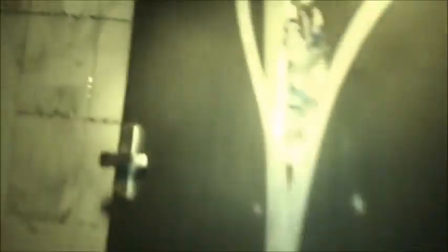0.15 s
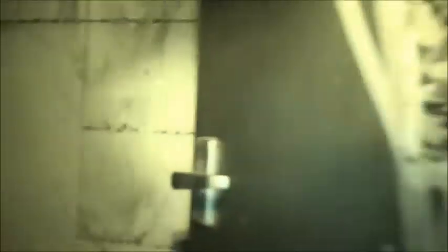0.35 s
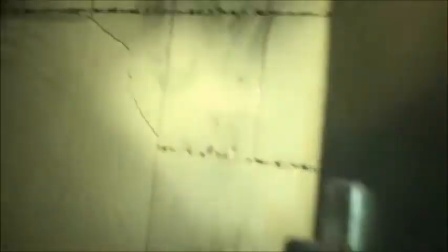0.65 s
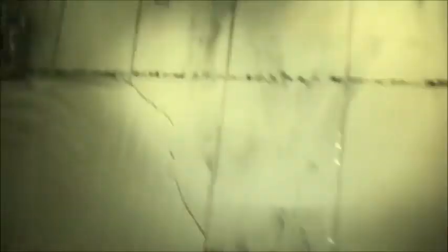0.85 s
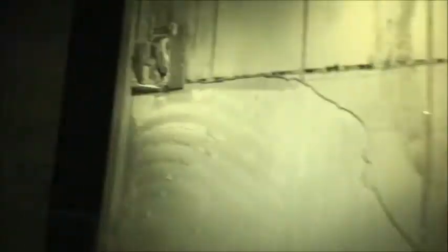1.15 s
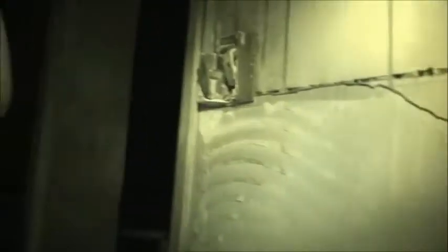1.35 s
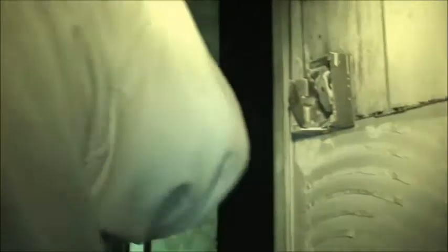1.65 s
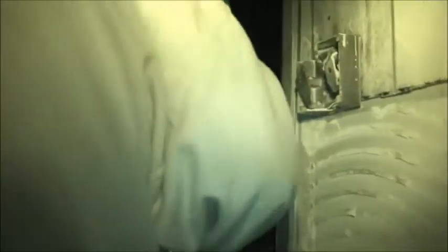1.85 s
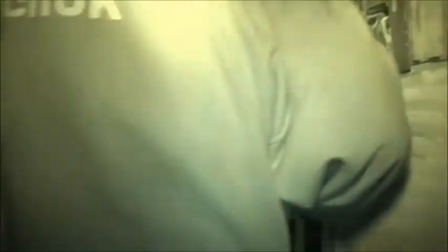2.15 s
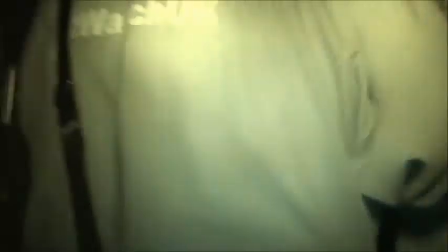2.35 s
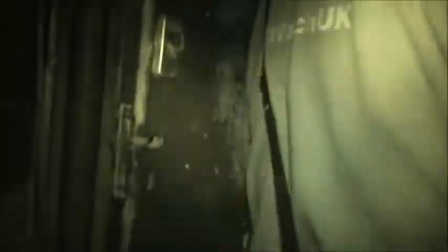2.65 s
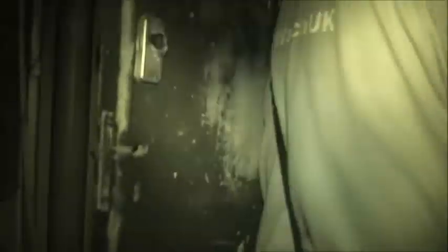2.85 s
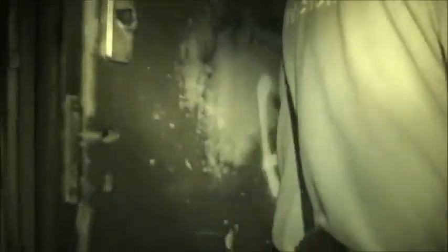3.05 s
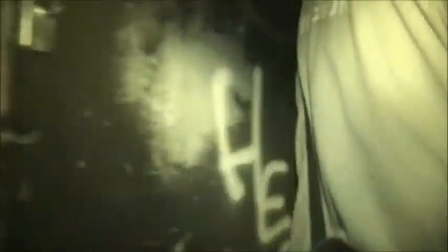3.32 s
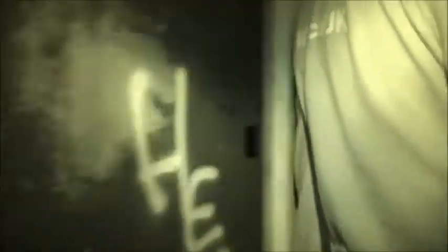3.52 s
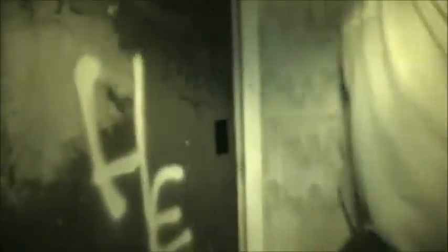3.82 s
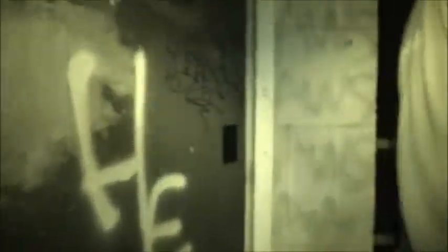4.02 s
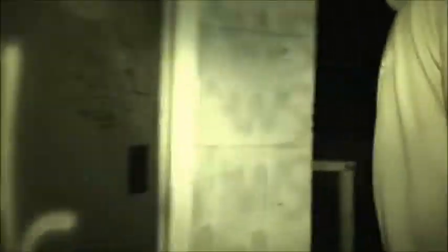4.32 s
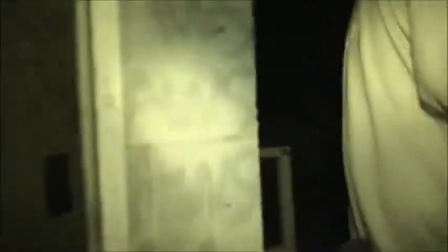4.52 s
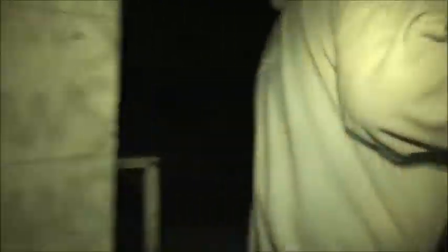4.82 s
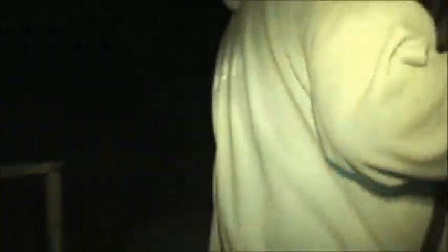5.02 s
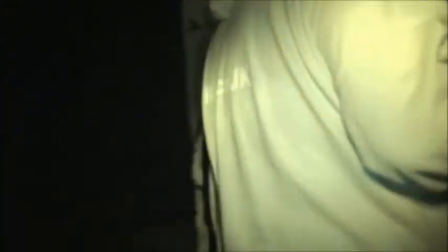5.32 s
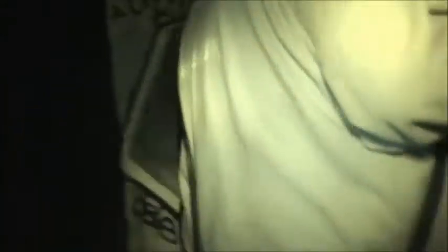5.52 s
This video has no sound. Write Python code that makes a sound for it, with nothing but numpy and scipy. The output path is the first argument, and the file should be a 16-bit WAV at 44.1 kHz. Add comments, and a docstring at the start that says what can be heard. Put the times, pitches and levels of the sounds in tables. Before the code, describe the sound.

Someone walks slowly over rubble and broken glass in a bare concrete passage. Grit crunches and shards clink first, then a slab scrapes with a rising, resonant groan. Uneven steps follow with sharp cracks, glassy tinkles, stone knocks and dull heel thuds, and near the end a piece of pane is kicked and rattles. A small stereo microphone is close, with faint handling rumble and hiss.

```python
"""Grit crunches and glass shards clink first; then a slab is dragged, and steps go on over rubble and glass.
The place is a bare concrete passage, heard close by a small stereo microphone.
Random clicks excite resonators for rubble, splinters and slab; lowpassed clicks on a sinking carrier make
the squeal. Struck stones, shards and pane are decaying sines, sliding shards gliding ones; noise drives the
floor modes, the grip rumble and the air. Decaying noise, convolved with the steps, gives the echoes."""
import sys
import numpy as np
from scipy import signal
from scipy.fft import rfft, irfft
from scipy.io import wavfile

SR = 44100
rng = np.random.default_rng(int(sys.argv[2]) if len(sys.argv) > 2 else 0)


def digitize_waveform(pressure):
    """Quantize a signal to 16-bit integers and store it at the path in sys.argv[1].

    Rows of a 2-D input are taken as channels; values are limited to [-1, 1].
    """
    field = np.atleast_2d(pressure).T
    bounded = np.clip(field, -1, 1)
    quanta = np.round(bounded * 32767).astype(np.int16)
    wavfile.write(sys.argv[1], SR, quanta)


def voltage_ratio(level):
    """Linear amplitude factor for a level in decibels (scalar or array-like)."""
    return 10 ** (np.asarray(level, float) / 20)


N = 250047

# Spectrum of still air and hiss: [f/Hz, level/dB]
AIR_SPECTRUM = [(18, -46), (30, -79), (64, -13), (118, 5), (1190, -2.5), (1320, -12), (1460, -91),
                (3060, -16.5), (16000, -21.5)]
AIR_DB, AIR_SIDE_DB = -57, -17    # the side level is relative to the mid

# The hand shifts its grip on the housing: [start t/s, hold t/s, level/dB]
GRIP_SHIFTS = [(0, .02, -56), (.6, 0.089, -50), (0.727, 0.43, -47.5), (1.43, .02, -63), (1.83, .02, -63)]
GRIP_RISE_DB_PER_S, GRIP_FALL_DB_PER_S, GRIP_REST_DB = 110, 61, -73.5

# Gain of the left-right difference in the echoes: [f/Hz, level/dB]
PORT_DIFFERENCE = [(60, -33), (150, -30), (400, -15.5), (700, -14.5), (1300, -16), (2400, -15), (4400, -15),
                   (7500, -16), (10500, -2)]
ROOM_T60_S, ROOM_DB, ROOM_CUT_HZ = 0.23, -11, 22000

# Weight coming onto the floor: [start t/s, hold t/s, force level/dB]
FLOOR_LOADS = [(0, 0.0033, -19), (0.126, .02, -31), (0.347, 0.025, -18.5), (0.527, 0.27, -12),
               (0.718, 0.3, -11), (1.044, 0.087, -23), (1.376, 0.017, -16), (1.831, .01, -17),
               (1.88, 0.12, -26), (2.145, 0.0077, -14), (2.19, 0.24, -22), (2.546, 0.047, -14),
               (2.983, 0.027, -25.5), (3.187, 0.0086, -24), (3.293, 0.28, -34), (3.876, 0.023, -35),
               (4.018, 0.061, -21.5), (4.193, 0.017, -15), (4.25, 0.12, -26), (4.448, .02, -36),
               (4.65, 0.018, -48), (4.993, 0.22, -24.5), (5.66, 0.012, -43)]
# Heels landing: [t/s, level/dB, thump f/Hz]
HEEL_THUDS = [(0.354, -28.5, 270), (1.389, -29.5, 221), (1.828, -33, 222), (2.144, -24.5, 283),
              (2.539, -34, 184), (2.971, -35.5, 133), (3.285, -39, 117), (4.031, -30.5, 270),
              (4.188, -25.5, 139), (4.954, -38, 160), (5.152, -32.5, 243), (5.194, -41.5, 95)]
# Low modes of the floor: [f/Hz, width f/Hz, level/dB]
FLOOR_RESONANCES = [(99, 23, -10.5), (145.4, 9.6, -5), (188.7, 8.1, 5.5), (215.7, 6.9, 3), (270, 26.6, -3)]
LOAD_RISE_DB_PER_S, LOAD_FALL_DB_PER_S, LOAD_REST_DB = 400, 143, -75

# Pulls on the dragged slab: [start t/s, hold t/s, level/dB]
SLAB_PULLS = [(0.495, 0.0086, -28), (0.598, 0.19, -23), (0.801, 0.14, -22), (0.992, 0.02, -29)]
# Centre of the lower slip band: [t/s, f/Hz]
SLIP_PITCH = [(.47, 1352), (.56, 1456), (.63, 1790), (.72, 2110), (.92, 2282), (.97, 2567)]
# Lowpass cutoffs of the clicks in the low slip band, high slip band and squeal: [f/Hz]
SLIP_HALF_WIDTHS = [330, 520, 260]
# Fixed modes of the slab: [f/Hz, width f/Hz, level/dB]
SLAB_RESONANCES = [(1160, 35, -12), (1317, 42, 11.5), (1610, 32, 0), (1856, 24, 7), (2050, 32, 3.5),
                   (2295, 71, 4), (2657, 33, 7), (3100, 120, 5), (3720, 65, 2), (4150, 110, 1.5)]
# A thin squeal under the slab: [start t/s, hold t/s, level/dB]
SLAB_SQUEAL = [(0.6, 0.063, -31.5)]
DRAG_RISE_DB_PER_S, DRAG_FALL_DB_PER_S = 405, 410
DRAG_HIGH_RATIO, DRAG_HIGH_DB = 1.45, -7.5    # upper slip band relative to the lower
SLIPS_DB = -5.5    # the slips heard without the slab
SQUEAL_RISE_DB_PER_S, SQUEAL_FALL_DB_PER_S = 300, 400
SQUEAL_HZ, SQUEAL_SAG_HZ_PER_S = 12400, 11000    # pitch at its start, and how it sinks

# Shards that slide and sing: [start t/s, hold t/s, level/dB, first f/Hz, last f/Hz]
SHARD_SLIDES = [(0.351, 0.024, -32, 2945, 2950), (1.319, 0.048, -29, 4310, 4320),
                (1.321, 0.046, -31, 4620, 4660), (1.37, 0.047, -39.5, 4700, 4510),
                (1.372, 0.046, -39, 4200, 4280), (1.946, 0.04, -36, 2560, 2570),
                (2.632, .012, -35, 7850, 7800), (2.648, 0.029, -32.5, 7830, 7730),
                (2.649, 0.018, -32, 4590, 4670), (2.729, 0.0059, -21, 1600, 1720),
                (2.743, 0.034, -28, 4600, 4650), (2.761, 0.04, -29, 1740, 1970),
                (2.765, 0.0363, -23, 5060, 5280), (2.772, 0.0305, -28, 5450, 5650),
                (4.234, 0.017, -31, 4740, 4560), (4.269, 0.022, -29, 2420, 2440),
                (4.315, 0.0044, -21.5, 6100, 6150), (4.324, 0.007, -21, 6320, 6150),
                (4.334, 0.004, -16, 6050, 6220), (4.467, 0.031, -43, 3250, 3290),
                (4.588, 0.01, -41.5, 886, 854)]
SLIDE_WAVER_SHARE, SLIDE_LUMPS_DB, SLIDE_FALL_DB_PER_S = 0.013, 5, 2000

# A larger piece of pane is kicked and rocks to rest:
# [t/s, level/dB, tilt level/dB per octave above 2 kHz, rattle t/s]
PANE_KICKS = [(5.281, -25, -18, 0.043), (5.339, -29.5, 2.5, 0.16), (5.405, -45.5, -16.5, 0.044),
              (5.447, -45, -8, 0.037), (5.482, -44, -11, 0.037)]
# Modes of the pane: [f/Hz, level/dB, T60 t/s]
PANE_RESONANCES = [(1248, -4.5, 0.069), (2120, -2.5, 0.092), (3250, -5, 0.091), (3676, 4, 0.11),
                   (4700, 0, 0.088), (5460, -1, 0.08), (7200, -6, 0.068), (7750, -4, 0.12), (8150, -5, .05),
                   (10820, -21, 0.14), (12590, -21, .13), (13780, -26, .12)]
PANE_CHATTER_DB, PANE_CHATTER_PER_S = 4, 120    # grit under the pane damps each mode on and off
PANE_LINGER_CYCLES = 1300    # the faint ring falls 60 dB in this many cycles

# Small glass shards that clink: [t/s, level/dB, f/Hz, rattle t/s]
SHARD_CLINKS = [(.03, -27, 5270, 0.39), (0.079, -19, 5200, 0.17), (.079, -13, 7080, 0.049),
                (.085, -25.5, 8270, .04), (0.281, -37, 4600, 0.22), (.305, -37, 3190, 0.12),
                (.35, -35, 11500, 0.027), (0.568, -18, 5610, 0.1), (0.885, -24, 6400, 0.033),
                (0.889, -23.5, 7700, 0.12), (1.238, -39.5, 5830, 0.93), (1.325, -23, 9420, 0.35),
                (1.349, -16, 4580, 0.1), (1.345, -18.5, 6960, 0.23), (1.414, -22, 9270, 0.035),
                (1.481, -33.5, 4700, 0.048), (1.832, -18.5, 5910, 0.21), (1.84, -22, 2455, 0.13),
                (1.9, -25.5, 1720, 0.059), (1.917, -23, 2730, 0.12), (1.982, -19, 2060, 0.034),
                (2.45, -32.5, 8770, 0.051), (2.638, -27, 5460, 0.027), (2.678, -34, 7100, .04),
                (2.7, -22.5, 4640, 0.097), (2.711, -27, 5500, 0.037), (2.73, -23, 8650, 0.12),
                (2.737, -18.5, 7170, 0.099), (2.856, -35, 8670, .1), (2.795, -22, 5000, 0.044),
                (2.823, -26.5, 5420, 0.066), (2.855, -23.5, 6820, 0.091), (2.862, -28, 2510, 0.031),
                (3.283, -33, 4030, 0.091), (3.546, -23, 8360, 0.045), (3.779, -41, 4190, 0.092),
                (4.172, -25.5, 7600, 0.41), (4.19, -22.5, 2050, 0.066), (4.226, -29, 5450, .03),
                (4.364, -18.5, 6040, 0.052), (4.358, -25.5, 8720, .05), (4.362, -19, 2275, 0.039),
                (4.421, -23, 890, 0.28), (4.437, -21, 1786, 0.11), (4.479, -28.5, 1924, 0.043),
                (4.478, -28.5, 900, 0.028), (4.555, -39, 896, 0.041), (5.119, -27, 5510, 0.09),
                (5.31, -35, 7900, 0.15)]
SHARD_T60_S, SHARD_ROUGH = 0.058, 0.63

# Larger stones that knock: [t/s, level/dB, f/Hz]
STONE_KNOCKS = [(0.351, -24.5, 2230), (0.8109, -42, 2050), (1.1047, -27, 810), (1.1388, -30, 990),
                (1.9828, -18, 2010), (2.146, -38, 2640), (2.5395, -22, 1570), (2.579, -33, 2040),
                (2.9768, -28, 910), (3.202, -21.5, 1150), (3.277, -35, 1430), (3.3246, -34, 740),
                (3.358, -29, 1335), (3.393, -36, 1300), (4.0255, -31, 1600), (4.0392, -21.5, 2130),
                (4.0828, -34, 1370), (4.272, -38, 2420), (4.3586, -17, 2200), (4.4333, -34, 890),
                (4.5155, -35.5, 860), (4.6429, -31.5, 1250), (5.1205, -28, 1210), (5.2797, -24.5, 1490),
                (5.6614, -42, 1130)]

# Soles grinding grit: [start t/s, hold t/s, level/dB, coarse share level/dB, dust share level/dB]
SOLE_SCUFFS = [(0, 0.0032, -29, -7, -1), (0.055, 0.086, -38, -4, -3.5), (0.265, 0.042, -41, -4.5, -5.5),
               (0.327, 0.035, -37, -13, -10), (0.35, 0.022, -30, -9, -6.5), (0.484, 0.038, -30.5, 3, -11),
               (0.546, 0.15, -26.5, 4.5, -2), (0.73, 0.067, -31, 7, -5), (0.819, 0.17, -37.5, 12, -7),
               (1.129, 0.018, -42, -14, -7.5), (1.327, 0.073, -28.5, -40, -6),
               (1.872, 0.07, -26, -13.5, -3), (1.92, 0.043, -30, -11.5, -23),
               (2.102, 0.011, -26, -9.5, -8.5), (2.151, 0.22, -38.5, -7, -17),
               (2.408, 0.11, -45.5, -7, -15), (2.553, 0.12, -30, -7.5, -9.5),
               (2.691, 0.02, -25.5, -27, -6.5), (2.733, .03, -27, -48, -13),
               (2.776, 0.054, -24.5, -23.5, -19), (2.98, 0.045, -38, -4.5, -10.5),
               (3.02, 0.097, -49, -3, -13), (3.296, 0.099, -46, 2.5, -11), (3.412, 0.11, -41.5, 5, -2.5),
               (3.52, 0.042, -39, -11, 2), (3.616, 0.21, -51, -2, 1), (4.029, .01, -35.5, -9, -1),
               (4.044, 0.0081, -26.5, -5, -12), (4.194, 0.012, -23, -8, -8), (4.217, 0.2, -34.5, -4.5, -3),
               (4.417, 0.021, -33, 0.5, -16), (4.968, 0.23, -48, 2, -6), (5.118, 0.037, -34, -5, -10),
               (5.183, 0.012, -29.5, -15, -26), (5.215, 0.036, -43.5, 6, -0.5),
               (5.29, 0.038, -31, -16, -22), (5.342, 0.17, -41.5, -11.5, -14),
               (5.508, 0.2, -47, -3.5, -23.5)]
# Pieces that crack: [t/s, level/dB, coarse share level/dB, dust share level/dB, T60 t/s]
CRACKING_PIECES = [(0.078, -22, -10, -28, 0.2), (0.199, -33.5, -14, -6, 0.21), (0.35, -29, 0, -11, 0.073),
                   (.398, -39, -20, 9, 0.19), (.4664, -28.5, -16, -14, 0.66), (0.809, -35, 11, -5, 0.33),
                   (1.103, -37, 11.5, -30, 0.17), (1.131, -46.5, 21, -22, 0.15),
                   (1.2086, -47.5, 1, 2, 0.31), (1.286, -49.5, 2, 9, 0.15), (1.3194, -33, -26, 0, 0.15),
                   (1.349, -28, -49, -5, 0.46), (1.417, -28, -21, 6, 0.035),
                   (1.648, -58.5, -17, 22.5, 0.13), (1.8241, -15.5, -19, -1.5, 0.23),
                   (1.835, -18.5, -12.5, -4.5, 0.31), (1.981, -16.5, -4, -19, 0.046),
                   (1.988, -18.5, -8, -22, 0.18), (2.11, -23, -30, -5, 0.072),
                   (2.1449, -12.5, -6.5, -10.5, 0.052), (2.151, -17, -10.5, -7.5, 0.17),
                   (2.447, -26.5, -12.5, -18, 0.13), (2.539, -23.5, 0.5, 5.5, 0.28),
                   (2.578, -22, 5, -11, 0.074), (2.7014, -19, -20, -2, 0.096),
                   (2.729, -11, -26, -11, 0.098), (2.777, -20.5, -32, -8, 0.21),
                   (2.858, -26, -13, -9, 0.19), (2.976, -27.5, 4, -27, 0.13), (3.088, -37, -15, -12, 0.036),
                   (3.152, -35.5, -4, -23, 0.22), (3.201, -18.5, -12, -15, 0.16),
                   (3.2776, -29, -5.5, 7, 0.14), (3.322, -30.5, 5, -26, 0.095), (3.357, -31, 3, -11, 0.1),
                   (3.391, -29, -8, -4, 0.44), (3.547, -24, -29, -7, 0.067), (3.954, -41.5, -18, -6, 0.12),
                   (4.0245, -16, -3.5, -5.5, 0.062), (4.0403, -9, -18, -20, 0.056),
                   (4.0817, -24, -3.5, -15, 0.15), (4.172, -31.5, -0.5, 7, 0.05),
                   (4.180, -31, -12, 8, 0.07), (4.189, -25.5, -15, 3.5, 0.17),
                   (4.2242, -15, -17, -5, 0.098), (4.271, -33, 4.5, -15, 0.098),
                   (4.318, -21.5, -4, 0.5, 0.16), (4.359, -17.5, -15, -10, 0.12),
                   (4.4333, -27, -1, -32, 0.15), (4.515, -44.5, 9, -5, 0.36),
                   (4.6408, -26.5, -6.5, -10, 0.17), (4.9407, -45, 8, -17, 0.062),
                   (4.9802, -35, -20, 2, 0.036), (5.015, -38, 9.5, 0, 0.016), (5.0762, -33, -3, -6, 0.11),
                   (5.1172, -28.5, 0.5, -6, 0.073), (5.1653, -15, -18, -1.5, 0.036),
                   (5.2803, -12, -14, -49, 0.095), (5.337, -19.5, -29, -11.5, 0.23),
                   (5.6614, -24, -7.5, -33, 0.034)]
# Grit that never quite settles, for coarse, fine and dust: [level/dB]
TRICKLE_LEVELS = [-63, -55, -65.5]
# Spectrum of the grit: [f/Hz, level/dB]
GRIT_SPECTRUM = [(400, -5.5), (900, 0), (2000, 3.5), (3300, -2.5), (5200, 1.5), (8000, 2.5), (10500, -3),
                 (12500, -1), (15500, -23)]
SCUFF_RISE_DB_PER_S, SCUFF_FALL_DB_PER_S = 461, 229
SPLINTERS_PER_S, SPLINTER_DB, SPLINTER_T60_S = 27, -12.5, 0.037    # rate is for each size

STONES_CUT_HZ = 300    # nothing from the slab, glass and stones sounds below this
WIDTH_CUT_HZ, CUTOFF_HZ = 11400, 16700    # stopband edges: left-right difference, whole mix


def rms_one(x):
    """Normalisation: a signal divided by its effective value has unit rms."""
    return x / np.sqrt(np.mean(x ** 2) + 1e-20)


def at_hz(points, hz):
    """Spectral interpolation: level is linear in the logarithm of frequency."""
    point_hz, level_db = np.array(points).T
    return np.interp(np.log(hz), np.log(point_hz), level_db)


def butterworth(x, order, hz, kind="low"):
    """Butterworth filtering: the passband is maximally flat."""
    return signal.sosfilt(signal.butter(order, hz, kind, fs=SR, output="sos"), x)


def resonance(x, hz, width_hz):
    """Damped oscillator: a two-pole band with gain near 1 at its peak."""
    r = np.exp(-np.pi * width_hz / SR)
    zeros = np.array([1, 0, -1]) * (1 - r * r) / 2
    poles = [1, -2 * r * np.cos(2 * np.pi * hz / SR), r * r]
    return signal.lfilter(zeros, poles, x + 1e-18)


def grains(per_s, spread_db, size):
    """Shot noise: random impulses of uneven size and sign, with unit rms."""
    draw = rng.random((3, size))
    sizes = voltage_ratio(spread_db * np.minimum(-np.log(draw[0] + 1e-9), 4))
    signs = np.sign(draw[1] - 0.5)
    return rms_one(sizes * signs * (draw[2] < per_s / SR))


def drift(rate):
    """Random modulation: normal values of spread 1, drawn at the given rate per second and joined by lines."""
    return np.interp(np.arange(N) * rate / SR, np.arange(4000), rng.standard_normal(4000))


def dying(t60, size):
    """Exponential decay: the level falls 60 dB in t60 seconds."""
    return voltage_ratio(-60 * np.arange(size) / SR / t60)


def swells(rows, levels_db, rise_db_per_s, fall_db_per_s):
    """Incoherent addition: rows rise, hold and fall at steady dB rates; powers add, one curve per level line."""
    start, hold = np.array(rows)[:, :2, None].transpose(1, 0, 2)
    t = np.arange(0, N, 32) / SR    # the curve moves in steps of 32 samples
    rise_db = -rise_db_per_s * np.maximum(start - t, 0)
    fall_db = -fall_db_per_s * np.maximum(t - start - hold, 0)
    power = voltage_ratio(2 * np.atleast_2d(levels_db)) @ voltage_ratio(2 * (rise_db + fall_db))
    return np.repeat(power, 32, axis=1)[:, :N]


def add(out, s, piece):
    """Superposition: a piece is summed in from its onset time."""
    i = round(s * SR)
    out[..., i:i + piece.shape[-1]] += piece[..., :N - i]


def air():
    """Stationary noise: still air and microphone hiss, nearly alike on both sides."""
    shape = voltage_ratio(at_hz(AIR_SPECTRUM, np.fft.rfftfreq(N, 1 / SR) + 1))
    mid, side = (rms_one(irfft(rfft(rng.standard_normal(N)) * shape, N)) for k in range(2))
    return voltage_ratio(AIR_DB) * (mid + voltage_ratio(AIR_SIDE_DB) * side * [[1], [-1]])


def grip():
    """Structure-borne sound: dull rumble carried through the housing straight to the microphone."""
    levels_db = np.transpose(GRIP_SHIFTS)[2]
    power = swells(GRIP_SHIFTS, levels_db, GRIP_RISE_DB_PER_S, GRIP_FALL_DB_PER_S)[0] + voltage_ratio(2 * GRIP_REST_DB)
    noise = rng.standard_normal(N)
    upper = resonance(resonance(noise, 59, 15), 59, 15)
    lower = resonance(resonance(noise, 32, 23), 32, 23)
    return np.sqrt(power) * rms_one(upper + 0.5 * lower)


def passage(x):
    """Diffuse reverberation: dense echoes off bare walls, heard somewhat differently by the two ports."""
    tails = rng.standard_normal((2, SR)) * dying(ROOM_T60_S, size=SR)
    tails[0] = butterworth(tails[0], 1, ROOM_CUT_HZ)
    tails[:, :round(0.004 * SR)] = 0    # the nearest wall answers after 4 ms
    tails[1] *= dying(0.031, size=SR)    # the difference dies sooner
    mid, side = (signal.fftconvolve(x, tail / np.linalg.norm(tail))[:N] for tail in tails)
    side = irfft(rfft(side) * voltage_ratio(at_hz(PORT_DIFFERENCE, np.fft.rfftfreq(N, 1 / SR) + 1)), N)
    return voltage_ratio(ROOM_DB) * mid + side * [[1], [-1]]


def floor():
    """Modal excitation: moving weight shakes the low modes of the floor; each heel adds a short thump."""
    force_db = np.transpose(FLOOR_LOADS)[2]
    load = swells(FLOOR_LOADS, force_db, LOAD_RISE_DB_PER_S, LOAD_FALL_DB_PER_S)[0] + voltage_ratio(2 * LOAD_REST_DB)
    push = np.sqrt(load) * rng.standard_normal(N)
    out = np.zeros(N)
    for k, (hz, width_hz, db) in enumerate(FLOOR_RESONANCES):
        out += (-1) ** k * voltage_ratio(db) * resonance(push, hz, width_hz)
    t = np.arange(SR // 4) / SR
    for s, db, hz in HEEL_THUDS:
        envelope = dying(14 / hz, size=len(t)) * (1 - np.exp(-t / 0.00085))
        add(out, s, voltage_ratio(db) * np.sin(2 * np.pi * hz * t) * envelope)
    return butterworth(out, 2, 85, "high")


def carried_clicks(hz, half_width_hz):
    """Amplitude modulation: lowpassed clicks on a moving carrier make a band around it."""
    clicks = rms_one(butterworth(grains(2500, 3.7, size=N), 2, half_width_hz))
    return clicks * np.cos(2 * np.pi * np.cumsum(hz) / SR)


def drag():
    """Stick-slip: clicks climb in pitch as the slab speeds up and light its fixed modes; a thin squeal falls."""
    pull_db, squeal_db = np.transpose(SLAB_PULLS)[2], np.transpose(SLAB_SQUEAL)[2]
    pull = np.sqrt(swells(SLAB_PULLS, pull_db, DRAG_RISE_DB_PER_S, DRAG_FALL_DB_PER_S)[0])
    squeal = np.sqrt(swells(SLAB_SQUEAL, squeal_db, SQUEAL_RISE_DB_PER_S, SQUEAL_FALL_DB_PER_S)[0])
    t = np.arange(N) / SR
    low_hz = np.interp(t, *np.transpose(SLIP_PITCH))
    squeal_hz = SQUEAL_HZ - SQUEAL_SAG_HZ_PER_S * (t - SLAB_SQUEAL[0][0])
    centres_hz = [low_hz, DRAG_HIGH_RATIO * low_hz, squeal_hz]
    low, high, thin = (carried_clicks(hz, width_hz) for hz, width_hz in zip(centres_hz, SLIP_HALF_WIDTHS))
    slips = pull * (low + voltage_ratio(DRAG_HIGH_DB) * high)
    slab = np.zeros(N)
    for k, (hz, width_hz, db) in enumerate(SLAB_RESONANCES):
        slab += (-1) ** k * voltage_ratio(db) * resonance(slips, hz, width_hz)
    return voltage_ratio(SLIPS_DB) * slips + slab + squeal * thin


def slides():
    """Friction-sustained vibration: a shard pressed along the concrete sings a gliding pitch and stops dead."""
    out, waver, lumps = np.zeros(N), drift(400), drift(300)
    for s, hold, db, start_hz, end_hz in SHARD_SLIDES:
        t = np.arange(round((hold + 0.05) * SR)) / SR
        here = slice(round(s * SR), round(s * SR) + len(t))
        hz = np.interp(t, [0, hold], [start_hz, end_hz]) * (1 + SLIDE_WAVER_SHARE * waver[here])
        level_db = db + SLIDE_LUMPS_DB * lumps[here] - SLIDE_FALL_DB_PER_S * np.maximum(t - hold, 0)
        onset = 1 - np.exp(-t / 0.002)
        add(out, s, voltage_ratio(level_db) * onset * np.sin(2 * np.pi * np.cumsum(hz) / SR))
    return out


def pane():
    """Impulse response: every touch strikes all modes of the pane; lying in grit, each mode rings brokenly."""
    out, t = np.zeros(N), np.arange(SR // 2) / SR
    hz, mode_db, t60 = np.array(PANE_RESONANCES).T[:, :, None]
    for s, db, tilt_db, rattle_s in PANE_KICKS:
        touches = 0.2 * np.abs(grains(300, 1.5, size=len(t))) * dying(rattle_s, size=len(t))
        touches[0] = 1
        chatter_db = PANE_CHATTER_DB * np.array([drift(PANE_CHATTER_PER_S)[:len(t)] for mode in hz])
        decay = voltage_ratio(-60 * t / t60) + 0.1 * voltage_ratio(-60 * t * hz / PANE_LINGER_CYCLES)
        rings = np.sin(2 * np.pi * hz * t) * voltage_ratio(chatter_db) * decay
        ring = (voltage_ratio(db + mode_db + tilt_db * np.log2(hz / 2000)) * rings).sum(axis=0)
        add(out, s, signal.fftconvolve(touches / np.linalg.norm(touches), ring)[:len(t)])
    return out


def clink(hz, t60, rattle_s, rough):
    """Repeated impact: one ringing pitch is touched again and again as it rattles; its peak is 1."""
    t = np.arange(SR // 3) / SR
    touches = 0.33 * rough * grains(800, 1.9, size=len(t)) * dying(rattle_s, size=len(t))
    touches[0] = 1
    detune = 1 + rng.uniform(0.0028, 0.054, (2, 1)) * [[1], [-1]]
    decay = dying(t60, size=len(t)) + 0.036 * dying(4 * t60, size=len(t))
    main = np.sin(2 * np.pi * hz * t) * decay
    beating = np.sin(2 * np.pi * hz * detune * t).sum(axis=0) * dying(0.5 * t60, size=len(t))
    sound = signal.fftconvolve(touches, main + rough * beating)[:len(t)]
    return sound / np.abs(sound).max()


def shards():
    """Beating of close modes: shards rattle on their neighbours with a rough clink, and a faint ring lingers."""
    out = np.zeros(N)
    for s, db, hz, rattle_s in SHARD_CLINKS:
        add(out, s, voltage_ratio(db) * clink(hz, SHARD_T60_S, rattle_s, SHARD_ROUGH))
    return out


def knocks():
    """Free vibration: a struck stone gives a short rough ring around its own pitch."""
    out, t = np.zeros(N), np.arange(SR // 8) / SR
    for s, db, hz in STONE_KNOCKS:
        pitches = hz * (1 + 0.11 * rng.standard_normal((3, 1)) * [[0], [1], [1]])
        partials = np.sin(2 * np.pi * pitches * t) * [[1], [0.6], [0.6]]
        add(out, s, voltage_ratio(db) * partials.sum(axis=0) * dying(30 / hz, size=len(t)))
    return out


def splinters(level_db):
    """Impulse-excited resonance: now and then a splinter in the moving grit chirps on a pitch of its own."""
    width_hz = np.log(1000) / (np.pi * SPLINTER_T60_S)
    out = np.zeros(N)
    for hz in np.geomspace(1500, 9000, num=16) * rng.uniform(0.92, 0.95, 16):
        gain = voltage_ratio(level_db + SPLINTER_DB + at_hz(GRIT_SPECTRUM, hz))
        out += resonance(gain * grains(SPLINTERS_PER_S, 3.5, size=N), hz, width_hz)
    return out


def rubble():
    """Size and resonance: grinding and cracking click small stones; large stones ring low, dust high."""
    db, coarse_db, dust_db = np.transpose(SOLE_SCUFFS)[2:]
    levels_db = [db + coarse_db, db, db + dust_db]
    power = swells(SOLE_SCUFFS, levels_db, SCUFF_RISE_DB_PER_S, SCUFF_FALL_DB_PER_S)
    power = power + voltage_ratio(2 * np.array(TRICKLE_LEVELS))[:, None]
    t = np.arange(SR // 2) / SR
    for s, db, coarse_db, dust_db, t60 in CRACKING_PIECES:
        snap = dying(t60, size=len(t)) + 0.26 * dying(0.01, size=len(t))    # a sharp snap, then it crumbles
        snap *= 1 - np.exp(-t / (0.007 * t60))    # slow crumblers also start slowly
        add(power, s, (voltage_ratio(db + np.array([[coarse_db], [0], [dust_db]])) * snap) ** 2)
    jolts = grains(500, 4.5, size=N)    # felt by all stones at once
    level_db = 10 * np.log10(power) + 0.78 * drift(90)    # the load on the heap shifts in jerks
    out = np.zeros(N)
    for k, hz in enumerate(np.geomspace(420, 15700, num=32)):
        # each stone size reads its level from the coarse, fine and dust curves
        place = np.interp(np.log(hz), np.log([1100, 4200, 10000]), range(3))
        low = min(int(place), 1)
        size_db = level_db[low] + (place - low) * (level_db[low + 1] - level_db[low])
        gain = voltage_ratio(size_db + 2.4 * drift(18) + 3 * drift(0.03 * hz))    # stones come and go
        clicks = 0.35 * jolts + grains(900 + 0.5 * hz, 3.8, size=N)
        band = resonance(resonance(gain * clicks, hz, 0.12 * hz), hz, 0.12 * hz)
        out += (-1) ** k * voltage_ratio(at_hz(GRIT_SPECTRUM, hz)) * band * np.sqrt(4000 / hz)
    return out + splinters(level_db[1])


def scene():
    """Superposition of sources: steps, their echoes, the hand and the air."""
    pieces = drag() + slides() + pane() + shards() + knocks() + rubble()
    steps = floor() + butterworth(pieces, 2, STONES_CUT_HZ, "high")
    return air() + grip() + passage(steps) + steps


def roll_off(x):
    """The treble ends steeply here."""
    return signal.sosfilt(signal.butter(12, 16440, fs=SR, output="sos"), x)


def record(dry):
    """Saturation and band limiting: peaks are rounded, the top is cut, the left-right difference ends lower."""
    held = 0.37 * np.tanh(dry / 0.34)
    width_cut = signal.cheby2(6, 12, WIDTH_CUT_HZ, fs=SR, output="sos")
    side = signal.sosfiltfilt(width_cut, (held[0] - held[1]) / 2)
    narrowed = held.mean(axis=0) + side * [[1], [-1]]
    top_cut = signal.cheby2(12, 70, CUTOFF_HZ, fs=SR, output="sos")
    return roll_off(signal.sosfilt(top_cut, narrowed))


dry = scene()
out = record(dry)
digitize_waveform(out)
```